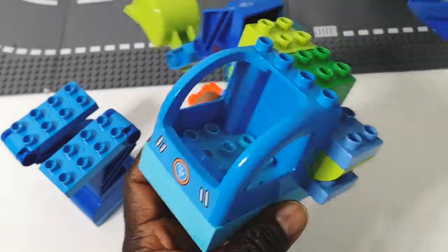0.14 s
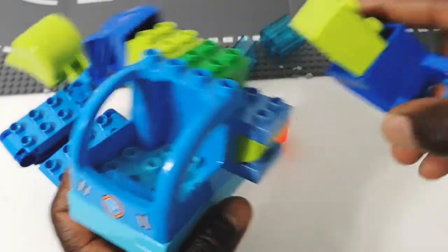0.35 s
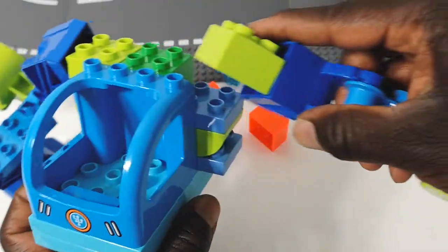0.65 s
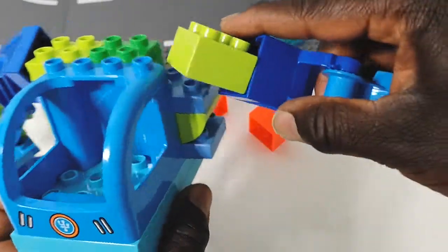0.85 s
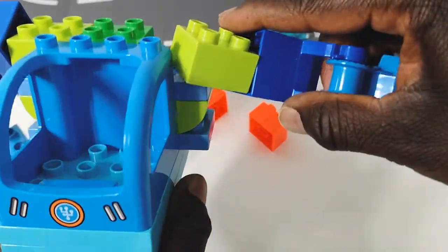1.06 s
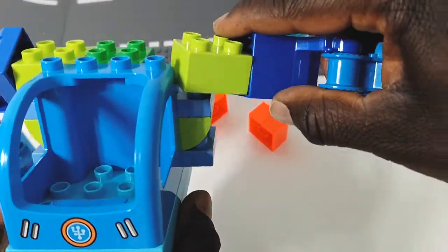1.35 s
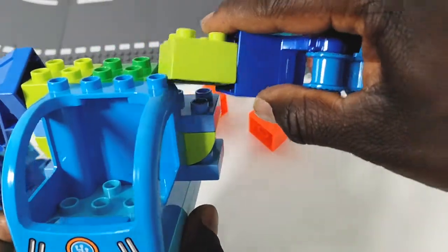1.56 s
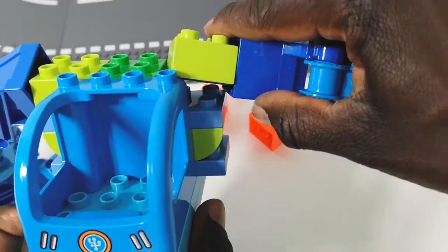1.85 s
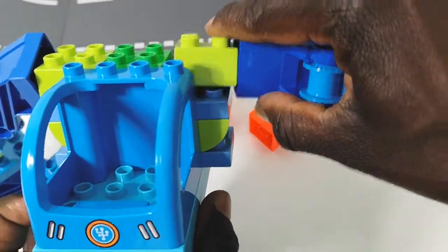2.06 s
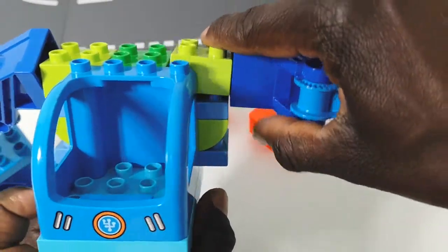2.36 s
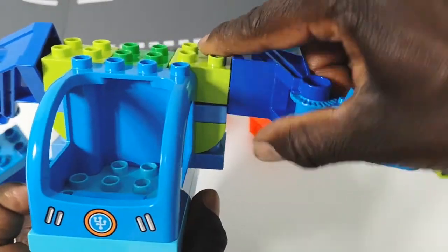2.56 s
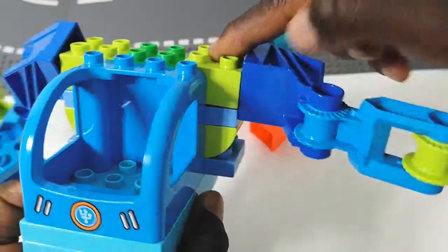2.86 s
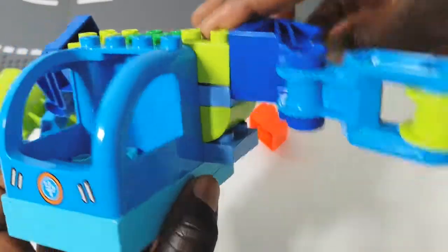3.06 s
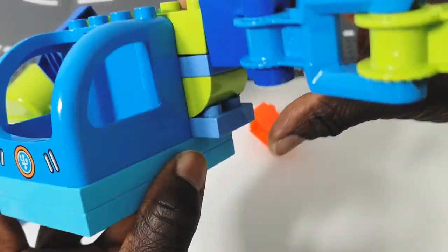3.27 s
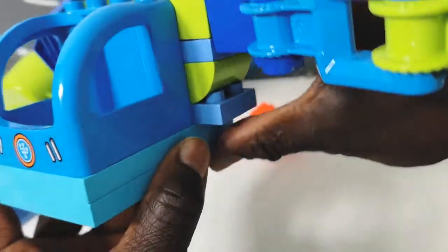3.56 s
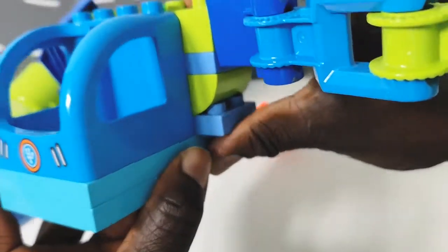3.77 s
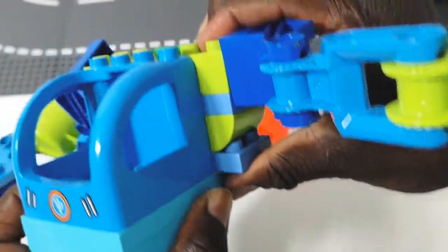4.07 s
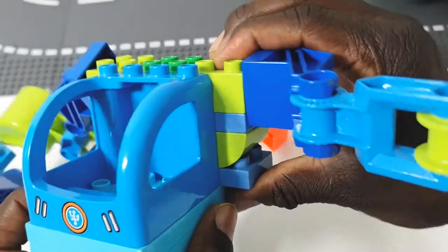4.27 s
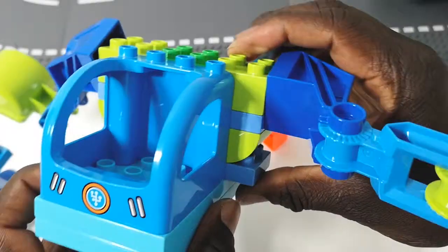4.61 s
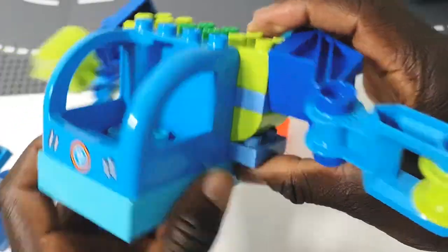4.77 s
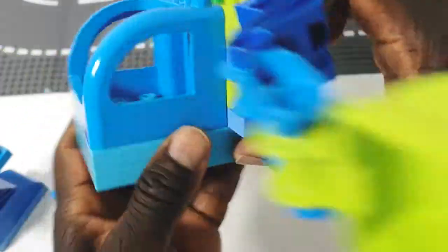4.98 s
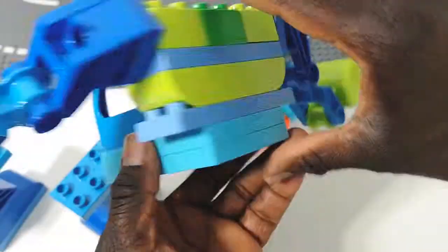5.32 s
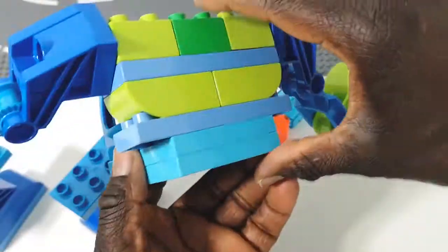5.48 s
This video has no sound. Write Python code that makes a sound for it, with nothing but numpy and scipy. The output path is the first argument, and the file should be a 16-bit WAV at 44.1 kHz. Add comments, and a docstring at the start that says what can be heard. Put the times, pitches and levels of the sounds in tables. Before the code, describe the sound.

Hands press chunky hollow toy bricks: sharp clicks, faint rubs and small squeaks, then a much louder burst of snaps near the end.

```python
"""A small room with a table: hands press large plastic toy bricks onto a toy truck.
Edges and studs click as filtered slip noise, a short noise crack and a resonance of the hollow shell.
The truck knocks on the table top: a noise thud, a short pulse and a boom of two beating modes.
Between the clicks plastic rubs, rattles and squeaks as grains and random touches drive resonances.
Diffuse reflections follow; low rumble, faint hiss and a faint low hum lie underneath."""
import sys
import numpy as np
from scipy import signal
from scipy.fft import rfft, irfft
from scipy.io import wavfile
from scipy.ndimage import uniform_filter1d

SR = 44100
rng = np.random.default_rng(int(sys.argv[2]) if len(sys.argv) > 2 else 0)


def store_pcm(level_fs):
    """Save levels as 16-bit WAV."""
    pcm = np.round(np.clip(level_fs, -1, 1) * 32767).astype(np.int16)
    wavfile.write(sys.argv[1], SR, np.atleast_2d(pcm).T)


N = 249165


def from_db(db):
    """Amplitude factor of a level in dB."""
    return 10 ** (np.asarray(db) / 20)


def rms_one(x):
    """Scale to rms 1."""
    return x / np.sqrt(np.mean(x ** 2) + 1e-20)


def peak_one(x):
    """Scale so that the loudest four milliseconds have rms 1."""
    power = uniform_filter1d(np.mean(np.atleast_2d(x) ** 2, axis=0), size=176)
    return x / np.sqrt(power.max() + 1e-20)


def at_hz(points, hz):
    """Read a spectrum on a log-frequency axis."""
    points = np.array(points)
    return np.interp(np.log(np.maximum(hz, 1)), np.log(points[:, 0]), points[:, 1])


def band(x, low_hz, high_hz, order=2):
    """Butterworth band-pass."""
    sos = signal.butter(order, [low_hz, high_hz], "band", fs=SR, output="sos")
    return signal.sosfilt(sos, x)


def resonance(x, hz, width_hz):
    """Two-pole resonance with gain 1 on top, at least 20 Hz wide."""
    r = np.exp(-np.pi * max(width_hz, 20) / SR)
    gain = (1 - r * r) / 2
    return signal.lfilter([gain, 0, -gain], [1, -2 * r * np.cos(2 * np.pi * hz / SR), r * r], x)


def coloured(x, spectrum):
    """Give x a spectrum of (Hz, dB) points."""
    size = x.shape[-1]
    gain = from_db(at_hz(spectrum, np.fft.rfftfreq(size, 1 / SR)))
    return irfft(rfft(x) * gain, size)


def panned(x, pan_db):
    """Make the left side louder than the right by pan_db."""
    return x * from_db([[pan_db / 2], [-pan_db / 2]])


def add(out, start_s, sound):
    """Lay a sound into the stereo track at start_s."""
    start = max(round(start_s * SR), 0)
    out[:, start:start + sound.shape[-1]] += sound[..., :N - start]


# Stereo noise. Each row: frequency in Hz, left-right correlation from 0 to 1.
LIKENESS = [(60, 0.98), (150, .95), (300, 0.67), (700, 0.03), (3000, .05)]


def stereo_noise(size):
    """White noise, alike on both sides in the bass and nearly unrelated in the treble."""
    mid, side = rfft(rng.standard_normal((2, size)))
    alike = at_hz(LIKENESS, np.fft.rfftfreq(size, 1 / SR))
    return irfft(np.sqrt((1 + alike) / 2) * mid + np.sqrt((1 - alike) / 2) * side * [[1], [-1]], size)


def grains(size, rough_db):
    """Tiny stick-slip contacts of very uneven size."""
    unevenness = np.minimum(rng.exponential(1, size), 4)
    return rms_one(rng.standard_normal(size) * from_db(rough_db * unevenness))


def decaying_pulses(modes, length_s, spread_db, turn_rad):
    """Sum of abrupt pulses, one per mode, with its decay, random strength and a phase unlike per ear."""
    t = np.arange(int(length_s * SR)) / SR
    out = np.zeros((2, len(t)))
    for hz, db, t60 in modes:
        sign = rng.choice([-1, 1])
        strength = sign * from_db(db + spread_db * rng.standard_normal((2, 1)))
        phase = turn_rad * rng.standard_normal() * np.array([[1], [-1]])
        drift_hz = hz / SR   # below hearing: shapes the decay, gives no pitch
        out += strength * from_db(-60 * t / t60) * np.sin(2 * np.pi * drift_hz * t + phase)
    return out


# Still room air. Each row: frequency in Hz, relative density in dB per Hz.
AIR = [(8, -20.5), (22, -1), (52, -8.5), (80, -19), (250, -26), (520, -37.5), (1100, -34.5), (2050, -28),
       (3400, -38.5), (8000, -35), (10500, -45), (15000, -54.5)]
AIR_DB = -63
HUM_HZ, HUM_DB = 101, -74.5


def background():
    """Coloured noise for low rumble and faint hiss, plus a steady sine hum."""
    hum = np.sqrt(2) * np.sin(2 * np.pi * HUM_HZ * np.arange(N) / SR)
    air = rms_one(coloured(stereo_noise(N), AIR))
    return from_db(AIR_DB) * air + from_db(HUM_DB) * hum


# Truck against table. Each row: start in seconds, knock in relative dB, boom in relative dB.
KNOCKS = [(0.118, -31, -53), (0.142, -31, -31), (2.86, -26, -30), (2.977, -31.5, -41), (3.096, -34, -45),
          (3.641, -35.5, -46.5), (3.685, -33.5, -46.5), (4.025, -33, -36), (4.066, -35.5, -48.5),
          (4.835, -35, -41.5), (4.946, -20.5, -26.5), (4.996, -28, -33.5)]
# Two lowest table modes, beating. Each row: frequency in Hz, relative level in dB, t60 in seconds.
TABLE_BOOM = [(101.8, -2, 0.48), (115.37, 1, 0.55)]
# Higher table modes. Each row: frequency in Hz, relative level in dB, t60 in seconds.
TABLE = [(195.8, 7, .52), (233, 3, .42), (311, 1, .4), (408, -4, 0.4), (544, -11, .25), (1613, -14, 1.8)]


def knocks(boom_db=-1.0, wood_db=-21.0, thud_db=-8.5, thud_t60_s=0.15):
    """A blow passes through the truck into the table: thud, short pulse, and a boom swelling as modes beat."""
    out = np.zeros((2, N))
    t = np.arange(SR) / SR
    boom = 0
    for k, (hz, db, t60) in enumerate(TABLE_BOOM):
        # opposite signs cancel at first
        boom = boom + (-1) ** k * from_db(db - 60 * t / t60) * np.sin(2 * np.pi * hz * t)
    for start_s, knock_level, boom_level in KNOCKS:
        wood = peak_one(band(decaying_pulses(TABLE, 1, spread_db=0.0, turn_rad=0.2), 130, 3000))
        thud = peak_one(band(stereo_noise(len(t)), 40, 380) * from_db(-60 * t / thud_t60_s))
        sound = from_db(boom_level + boom_db) * boom
        sound = sound + from_db(knock_level + wood_db) * wood
        sound = sound + from_db(knock_level + thud_db) * thud
        add(out, start_s, sound)
    return out


# Brick walls. Each row: frequency in Hz, relative level in dB, t60 in seconds.
BRICK = [(848, -1.5, 0.044), (1330, -4.5, 0.025), (1676, -1, 0.018), (2146, -3, 0.057), (2566, -6.5, 0.16),
         (3250, -12.5, 0.05), (3910, 0.5, 0.027), (4494, -3, 0.036), (5230, -3, 0.039),
         (6800, -10.5, 0.031), (7390, -1.5, .08)]


def brick_click(shell_hz, width_hz, slip_ms,
                crack_db=1.5, crack_t60_s=0.025, apart=8.0, tail_db=-16.5, tail_t60_s=0.22):
    """An edge slips for a millisecond or so; returns the sound of the walls and of the hollow shell."""
    t = np.arange(SR // 7) / SR
    age = 1000 * t / slip_ms
    contact = grains(len(t), rough_db=2.5) * age * np.exp(-age)
    wall_decay = decaying_pulses(BRICK, 1 / 7, spread_db=1.5, turn_rad=1.0)
    walls = signal.fftconvolve(wall_decay, contact[None])[:, :len(t)]
    # longer, faint tail of walls that the fingers do not touch
    free_walls = [(hz, db, tail_t60_s) for hz, db, _ in BRICK]
    tail = decaying_pulses(free_walls, 1, spread_db=2.0, turn_rad=1.0)[:, :len(t)] * (1 - np.exp(-age))
    # noise crack that differs between the ears
    noise = rng.standard_normal(len(t)) + apart * rng.standard_normal((2, len(t)))
    crack = noise * (1 - np.exp(-age / 2)) * from_db(-60 * t / crack_t60_s)
    shell = resonance(peak_one(crack) + peak_one(contact), shell_hz, width_hz)
    walls = peak_one(walls) + from_db(crack_db) * peak_one(crack) + from_db(tail_db) * peak_one(tail)
    return walls, shell


# Plastic on plastic. Each row: start in seconds, relative level in dB, relative treble in dB,
# finger grip from 0 to 1, shell pitch in Hz.
CLICKS = [(0.1202, -27.5, -2, 1, 2080), (0.134, -32, -1, 0.6, 2070), (0.141, -22, -2.5, 0.98, 2050),
          (0.4442, -37.5, -7.5, 0.9, 2350), (0.6804, -43.5, -5.5, 1, 2320), (0.708, -46, -10.5, 1, 2160),
          (0.763, -45, 0.5, 0.7, 2150), (1.0962, -50, 5.5, 0.97, 2160), (1.208, -63.5, 4, 0.6, 2150),
          (1.2654, -27, -2.5, .2, 1990), (1.3352, -30.5, -17, 0.6, 1730), (1.376, -40.5, -3.5, 0.92, 2030),
          (1.4284, -31.5, -14.5, 0.46, 1820), (1.637, -50, -11.5, .35, 2070), (1.713, -24, -10, 0, 2193),
          (1.8369, -39, 0.5, 1, 1990), (1.8403, -29, -10.5, 0.79, 2000), (1.985, -53, -3, 0.6, 2020),
          (2.104, -51.5, -6.5, 0.2, 1780), (2.1302, -45.5, -2, 0.57, 1740), (2.8617, -29.5, -7, 0.93, 2100),
          (2.9173, -28.5, -13.5, 0.6, 2220), (2.998, -30.5, -10, 0.16, 1900), (3.202, -62.5, -1.5, 0, 2150),
          (3.36, -41, 2.5, 0.6, 2220), (3.5101, -47, 5.5, 0.24, 2320), (3.5607, -44, -12, 0.3, 2350),
          (3.5831, -42.5, 6.5, 0, 2250), (3.6417, -33, -8, 0.47, 2160), (3.684, -30.5, -5, 0.45, 2280),
          (4.0008, -42.5, -10, 0.76, 2320), (4.0241, -40, -7.5, 1, 1730), (4.0647, -44.5, 3.5, 1, 1980),
          (4.6424, -41, -14.5, 0, 2160), (4.687, -47.5, -18, 0, 2170), (4.835, -15.5, -10.5, 0.06, 2190),
          (4.8415, -16.5, -3.5, 0.4, 2230), (4.901, -24, -6.5, 0.53, 2020), (4.9413, -22, -3, 0.84, 2210),
          (4.947, -9, -8.5, 0.67, 2260), (4.996, -17, -11, 0.63, 2270), (5.022, -26, -12, 0.63, 2450),
          (5.06, -27.5, -0.5, .65, 2380), (5.067, -19, -8.5, 0.67, 2460)]
# Registers body, shell, edge, snap. Each row: low edge in Hz, high edge in Hz.
BAND_EDGES_HZ = [(600, 1250), (1200, 3000), (3200, 6000), (6000, 9000)]
# a firm grip damps the shell and couples it to the body of the truck
FREE_WIDTH_HZ, GRIP_WIDTH_HZ = 105, 400   # loose width, widening at full grip
FREE_BODY_DB, GRIP_BODY_DB = -37.5, 32.5   # loose level, gain at full grip
# a duller click is a longer slip, and loses its highest register first
SLIP_MS, SLIP_DOUBLING_DB = 0.79, 29.5   # slip at 0 dB treble; treble loss that doubles it
EDGE_FOLLOWS, SNAP_FOLLOWS = 0.82, 1.37   # dB per dB of treble
EDGE_PAN_DB, SNAP_PAN_DB, SHELL_PAN_DB = 3, 2.5, 2   # left minus right


def clicks(edge_db=-2.64, snap_db=0.44, top_db=-14.5):
    """Force sets the level of a click, slip speed its treble, and grip its damping and body."""
    out = np.zeros((2, N))
    for start_s, level_db, treble_db, grip, shell_hz in CLICKS:
        slip_ms = SLIP_MS * 2 ** (-treble_db / SLIP_DOUBLING_DB)
        walls, hollow = brick_click(shell_hz, FREE_WIDTH_HZ + GRIP_WIDTH_HZ * grip, slip_ms)
        snap_level = snap_db + SNAP_FOLLOWS * treble_db
        registers = [(walls, FREE_BODY_DB + GRIP_BODY_DB * grip),
                     (panned(hollow, SHELL_PAN_DB), 0),
                     (panned(walls, EDGE_PAN_DB), edge_db + EDGE_FOLLOWS * treble_db),
                     (panned(walls, SNAP_PAN_DB), snap_level)]
        # faint top of the snap
        sound = from_db(snap_level + top_db) * peak_one(band(walls, 8500, 12000))
        for (x, db), edges in zip(registers, BAND_EDGES_HZ):
            sound = sound + from_db(db) * peak_one(band(x, *edges, order=3))
        add(out, start_s, from_db(level_db) * sound)
    return out


def rattle(touches_per_s=110, size_db=8.0, detune=0.044, count=3):
    """Loose parts of three sizes touch at random; each touch wakes one wall mode, partly alike in both ears."""
    out = np.zeros((2, N))
    for scale in 1 + detune * np.linspace(-1, 1, count):
        for hz, db, t60 in BRICK:
            touches = np.zeros((2, N))
            at = np.flatnonzero(rng.random(N) < touches_per_s / SR)
            force, together, left, right = rng.standard_normal((len(at), 4)).T
            strength = from_db(size_db * np.clip(force, -2, 2))
            touches[:, at] = strength * (0.58 * together + np.array([left, right]))
            width_hz = np.log(1000) / (np.pi * t60)
            out += from_db(db) * rms_one(resonance(touches + 1e-18, hz * scale, width_hz))
    return rms_one(out)


RUB_ATTACK_S, RUB_RELEASE_DB_PER_S = 0.011, 339.5


def stroke(start_s, length_s, fade_db_per_s):
    """Envelope of one rub: a quick attack, a steady fade or swell while it lasts, then a release."""
    age = np.arange(N) / SR - start_s
    fall_db = fade_db_per_s * np.clip(age, 0, length_s)
    fall_db = fall_db + RUB_RELEASE_DB_PER_S * np.maximum(age - length_s, 0)
    return np.clip(age / RUB_ATTACK_S, 0, 1) * from_db(-fall_db)


# Parts rattling or sliding on each other. Each row: start in seconds, length in seconds, level in dB,
# fade in dB per second (negative swells), hiss in dB and body in dB against the level.
RUBS = [(0.121, 0.19, -30.5, 103, -2.5, -5), (0.254, 0.12, -48, 73, 2.5, -5.5),
        (0.46, 0.062, -55.5, 18, -4.5, -0.5), (0.583, 0.076, -56.5, -30, 1.5, -1.5),
        (2.524, 0.04, -60, 33, -11, -26), (2.595, 0.036, -62, -82, -9, -36),
        (2.86, 0.13, -46, -5, -12.5, -3), (2.998, 0.12, -47.5, 42, -3, -0.5),
        (3.385, 0.19, -77, -58, 4.5, -14), (3.558, 0.2, -56.5, -6, -4.5, -3),
        (3.684, 0.055, -48.5, 70, -5.5, -4), (3.78, 0.12, -62, 15, -2.5, 0.5),
        (3.949, 0.079, -67, -100, -6.5, 5.5), (4.023, 0.06, -39, 117, -8.5, 3.5),
        (4.23, 0.16, -96.5, 2, 21.5, -5), (4.509, 0.05, -69.5, 4, 2, -17),
        (4.947, 0.2, -25.5, 77, -4.5, -11.5), (5.44, 0.16, -79.5, -33.5, 2.5, -5.5)]


def rubbing(scratch_db=0.5, table_db=10.0):
    """Small touches and stick-slip grains drive bricks, and noise the table, while parts move."""
    grip = from_db(4 * rms_one(band(rng.standard_normal(N), 25, 160)))
    scratch = rms_one(grip * grains((2, N), rough_db=2.5))
    plastic = rattle() + from_db(scratch_db) * scratch
    push = stereo_noise(N)
    table = sum(from_db(db) * resonance(push, hz, 20) for hz, db, _ in TABLE)
    wood = rms_one(band(table, 210, 990))
    body = rms_one(rms_one(band(plastic, 600, 1100)) + from_db(table_db) * wood)
    shell = rms_one(band(plastic, 1088, 3100))
    hiss = rms_one(band(plastic, 3460, 8490, order=4))
    out = np.zeros((2, N))
    for start_s, length_s, level_db, fade, hiss_db, body_db in RUBS:
        sound = shell + from_db(hiss_db) * hiss + from_db(body_db) * body
        out += from_db(level_db) * stroke(start_s, length_s, fade) * sound
    return out


# A tight stud chafes. Each row: start in seconds, end in seconds, pitch in Hz,
# start level in relative dB, end level in relative dB.
SQUEAKS = [(0.6, 0.672, 2670, -54, -45), (1.979, 2.117, 2105, -56.5, -59.5),
           (2.739, 2.876, 2187, -50.5, -31.5), (2.925, 3.052, 2129, -49, -36),
           (3.565, 3.636, 2440, -36, -71), (3.655, 3.753, 2270, -37.5, -34.5),
           (4.849, 4.924, 2142, -17, -25)]


def squeaks(level_db=-8.5, waver=0.0062, rasp_db=-2.0, onset_s=0.007):
    """Chafing keeps one shell resonance singing, with an unsteady pitch and some rasp around it."""
    out = np.zeros((2, N))
    t = np.arange(SR // 4) / SR
    for start_s, end_s, hz, start_db, end_db in SQUEAKS:
        slip, grip = [rms_one(band(rng.standard_normal(len(t)), 20, 150)) for _ in range(2)]
        phase = 2 * np.pi * np.cumsum(hz * (1 + waver * slip)) / SR
        tone = rms_one(from_db(grip) * np.sin(phase + np.array([[0], [1]])))
        rasp = resonance(grains((2, len(t)), rough_db=7.5), hz, 220)
        rasp = rms_one(resonance(rasp, hz, 790))
        length_s = end_s - start_s
        gate = np.clip(np.minimum(t, length_s - t) / onset_s, 0, 1)
        level = from_db(level_db + np.interp(t, [0, length_s], [start_db, end_db]))
        add(out, start_s, (tone + from_db(rasp_db) * rasp) * gate * level)
    return out


# Reverberation time. Each row: frequency in Hz, t60 in seconds.
ROOM_T60 = [(150, 0.47), (700, 0.27), (2000, 0.33), (7000, 0.28), (14000, 0.085)]
# Reverberation colour. Each row: frequency in Hz, level in dB.
ROOM_COLOUR = [(100, -11), (300, -2.5), (1000, -12), (2000, -1), (4000, -13), (8000, -3), (14000, -15)]


def room(x, build_s=0.0035):
    """Diffuse reflections build up within milliseconds and die away octave by octave."""
    t = np.arange(int(0.8 * SR)) / SR
    white = stereo_noise(len(t))
    response = 0
    for hz in 88 * 2.0 ** np.arange(8):
        fade = from_db(-60 * t / at_hz(ROOM_T60, hz)) * (1 - np.exp(-(t / build_s) ** 2))
        fade = fade / np.sqrt(np.sum(fade ** 2))
        octave = band(white, hz / np.sqrt(2), hz * np.sqrt(2), order=3)
        response = response + from_db(at_hz(ROOM_COLOUR, hz)) * octave * fade
    return signal.fftconvolve(x, response, axes=1)[:, :N]


def scene():
    """Bricks and table, their room and the background."""
    toy = knocks() + clicks() + rubbing() + squeaks()
    return toy + room(toy) + background()


CUTOFF_HZ = 15700


def record(dry):
    """The hardest peaks are rounded and the top is cut steeply."""
    rounded = dry / (1 + (dry / 0.88) ** 6) ** (1 / 6)
    return signal.sosfilt(signal.ellip(10, 0.2, 80, CUTOFF_HZ, fs=SR, output="sos"), rounded)


dry = scene()
out = record(dry)
store_pcm(out)
```